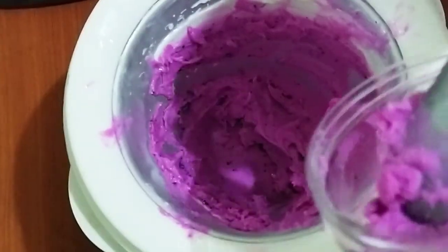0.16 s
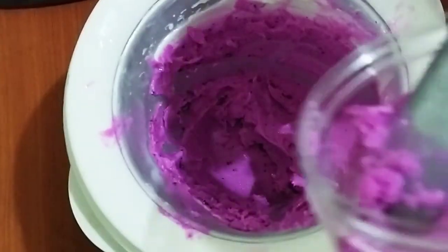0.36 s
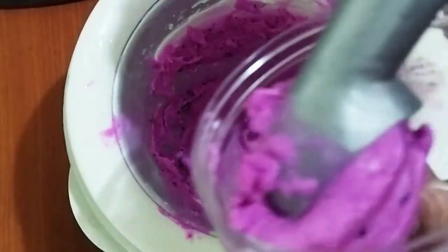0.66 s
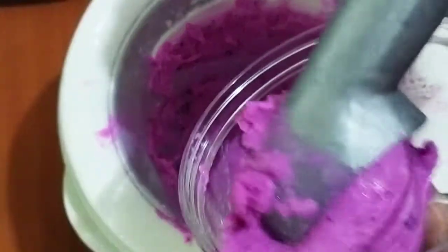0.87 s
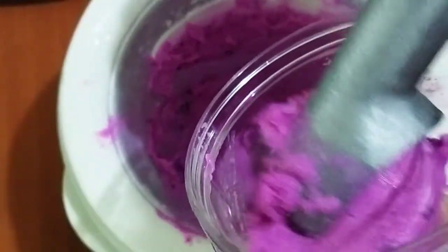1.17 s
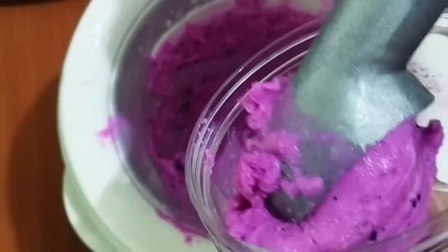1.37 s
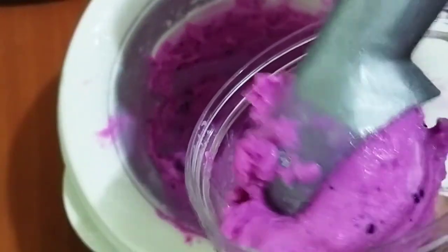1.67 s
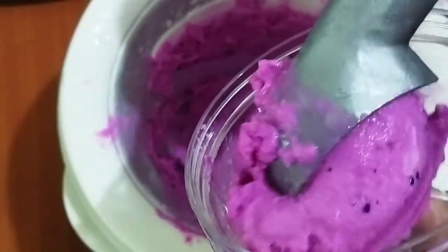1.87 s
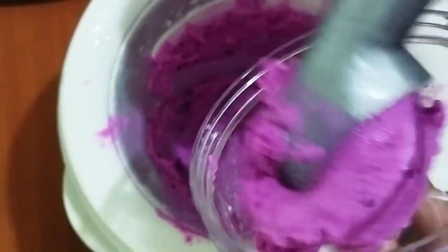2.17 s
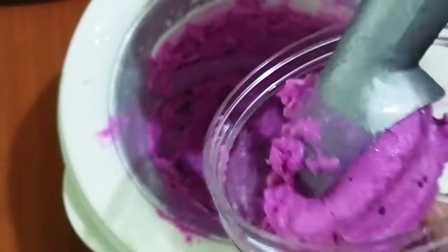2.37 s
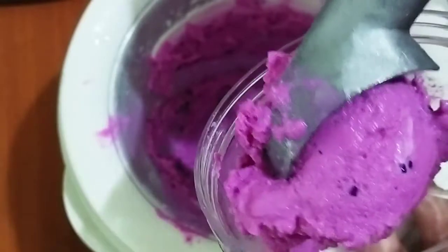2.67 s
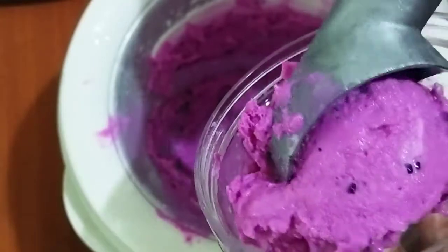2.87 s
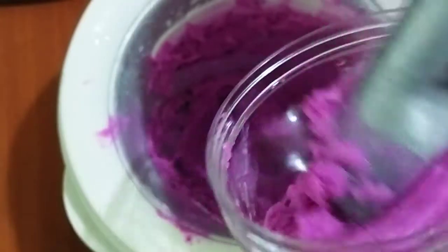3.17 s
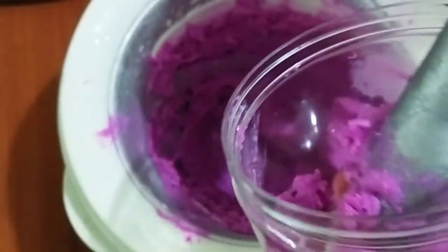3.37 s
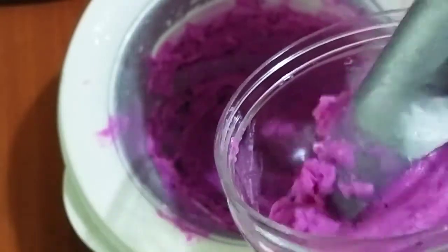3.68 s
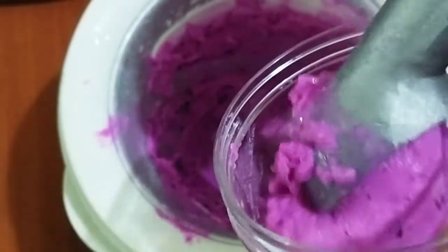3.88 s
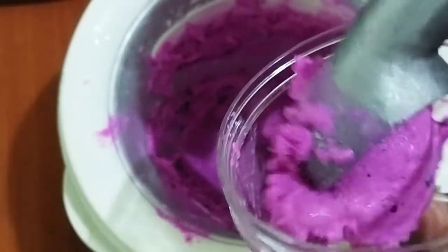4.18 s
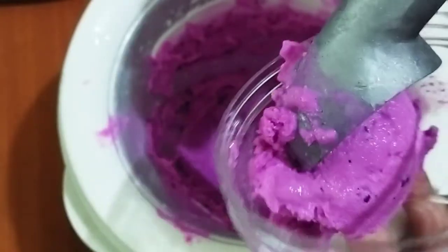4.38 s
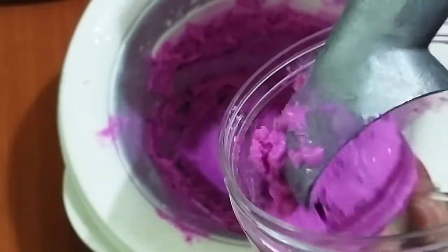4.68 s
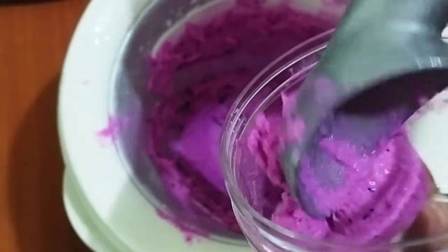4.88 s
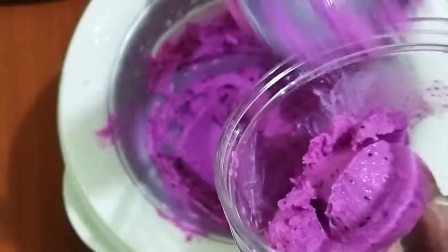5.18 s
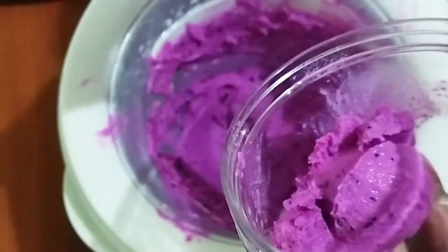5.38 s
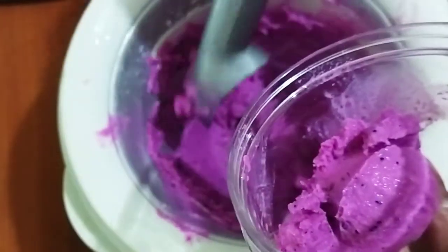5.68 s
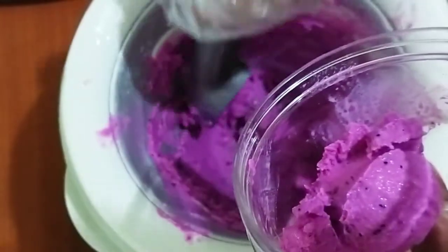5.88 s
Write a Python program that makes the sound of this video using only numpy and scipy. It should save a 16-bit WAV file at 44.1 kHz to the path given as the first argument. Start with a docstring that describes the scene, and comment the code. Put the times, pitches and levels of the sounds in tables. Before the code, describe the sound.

Very close stereo in a small kitchen with low, steady ventilation rumble. A metal scoop raps a hand-held bowl four times early, once much harder midway, then three softer times, each a hard tick with a short, damped, hollow ring and a brief room tail. Between blows, soft frozen dessert smears stickily with fine crackles and tiny bright ticks. At the end a thin plastic glove crinkles and rubs.

```python
"""A metal scoop knocks eight times on a hand-held bowl to shake off soft frozen dessert, close to the microphone:
each knock is a filtered noise tick plus decaying bowl modes.
Sticky dessert smears (filtered slips, small snaps) and ticks (short pings with splashes) between the knocks.
At the end a plastic glove rustles, made of crinkle hiss, rubbing grains and crease snaps.
A small kitchen (echoes, noise tail) answers each sound, over a low ventilation rumble of shaped noise."""
import sys
import numpy as np
from scipy import signal
from scipy.fft import rfft, irfft
from scipy.io import wavfile

SR = 44100
rng = np.random.default_rng(int(sys.argv[2]) if len(sys.argv) > 2 else 0)


def put_to_file(sound):
    """Save the sound as 16-bit audio at rate SR, in the file named by the first command-line argument."""
    columns = np.atleast_2d(sound).T  # one column per channel
    safe = np.clip(columns, -1, 1)
    whole_steps = np.round(safe * 32767)
    wavfile.write(sys.argv[1], SR, whole_steps.astype(np.int16))


N = 266804  # samples

# Left-right likeness of diffuse sound. Each row: frequency in Hz, likeness from 0 to 1.
LIKENESS = [(30, 0.93), (70, 0.98), (150, 1), (300, 0.83), (640, 0.38), (1400, 0.031), (4000, 0.027)]
# Spectrum of snapping dessert. Each row: frequency in Hz, relative level in dB.
SNAP_COLOUR = [(500, -30), (2000, -0.5), (4500, 4), (7000, 2.5), (10000, 6.5), (12500, 8.5), (16000, 7.5)]
EDGE_HZ = 16100  # upper band limit
BALANCE = np.array([[.5], [-.5]])  # left, right share of a pan in dB


def from_db(db):
    """Decibels to gain."""
    return 10 ** (np.asarray(db) / 20)


def unit(x):
    """Scales to rms 1."""
    return x / np.sqrt(np.mean(x ** 2) + 1e-20)


def read(points, hz):
    """Reads a table on a log-frequency axis."""
    f, value = np.transpose(points)
    return np.interp(np.log(hz + 1), np.log(f + 1), value)


def add(mix, start_s, sound):
    """Mixes a stereo sound in at start_s."""
    part = mix[:, max(round(start_s * SR), 0):][:, :sound.shape[1]]
    part += sound[:, :part.shape[1]]


def colour(x, points, size=2048):
    """Minimum-phase filter with the given spectrum; causal, so attacks stay sharp."""
    log_gain = np.log(from_db(read(points, abs(np.fft.fftfreq(size, 1 / SR)))))
    spectrum = np.exp(np.conj(signal.hilbert(log_gain)))
    taps = np.fft.ifft(spectrum).real[:size // 2]
    return signal.oaconvolve(x, taps[None], axes=1)[:, :x.shape[1]]


def correlate(left, other, hz):
    """Blends two independent spectra into a right channel as like the left as LIKENESS says."""
    same = np.clip(read(LIKENESS, hz), 0, 1)
    if left.ndim > 1:
        same = same[:, None]
    return same * left + np.sqrt(1 - same ** 2) * other


def ventilation(rms_db=-48.5):
    """Steady rumble lifted by the room's low modes, nearly mono in the bass."""
    # Each row: frequency in Hz, relative spectral level in dB.
    air_colour = [(25, -49), (50, -15.5), (66, -36), (85, -3), (130, -1.5), (200, -7), (300, -7.5),
                  (450, -14), (800, -21.5), (1500, -28), (3000, -32.5), (6000, -44), (10000, -52.5),
                  (16000, -47)]
    # Room modes. Each row: frequency in Hz, width in Hz, lift in dB.
    room_modes = [(89, 13, 6), (125, 3.2, 11.5), (161.6, 9.8, 3.5), (190.3, 10.6, 11), (278.6, 2.3, 9)]
    hz = np.fft.rfftfreq(N, 1 / SR)
    left, other = rfft(rng.standard_normal((2, N)))
    level_db = read(air_colour, hz)
    for mode_hz, width_hz, lift_db in room_modes:
        level_db = level_db + lift_db / (1 + (2 * (hz - mode_hz) / width_hz) ** 2)
    stereo = np.array([left, correlate(left, other, hz)])
    return from_db(rms_db) * unit(irfft(stereo * from_db(level_db), N))


def push(start_s, length_s, skew=1.3, sharpness=1.5):
    """Pressure of one push: it builds slowly, peaks late and lets go faster."""
    progress = np.clip((np.arange(N) / SR - start_s) / length_s, 0, 1)
    return abs(np.sin(np.pi * progress ** skew)) ** sharpness


def friction(stroke, points, per_s, spread_db, clump_db, clump_s, pan_db):
    """Countless tiny slips of uneven size come in clumps and merge into a grainy hiss."""
    t, knots = np.arange(N) / SR, np.arange(0, N / SR, clump_s)
    sizes = from_db(spread_db * np.minimum(rng.exponential(1, N), 4))
    happens = rng.random(N) < per_s / SR
    slips = rng.standard_normal((2, N)) * sizes * happens
    slips *= from_db(clump_db * np.interp(t, knots, rng.standard_normal(len(knots))))
    return unit(colour(slips, points)) * stroke * from_db(BALANCE * pan_db)


def crackle(stroke, points, per_s, spread_db, decay_s):
    """Separate little snaps of uneven size, each ringing briefly at its own pitch."""
    t = np.arange(SR // 280) / SR
    draws = rng.random((round(per_s * N / SR), 5))
    when, pitch, chance, *phases = draws.T[:, :, None]
    sizes = from_db(spread_db * np.minimum(-np.log(1 - chance), 3))
    shape = sizes * np.exp(-t / decay_s)
    at = ((when * N).astype(int) + np.arange(len(t))).ravel()
    snaps = []
    for phase in phases:  # left, right
        rings = shape * np.sin(2 * np.pi * (pitch * EDGE_HZ * t + phase))
        snaps.append(np.bincount(at, rings.ravel(), N)[:N])
    return unit(colour(np.array(snaps), points)) * stroke


def smear(gain_db=-2, cling_db=-74, cell_share=.6):
    """Wet dessert slides over the metal, and small air cells in it burst as it goes."""
    # Pushes through the dessert. Each row: start in seconds, length in seconds, level in dB before gain_db.
    pushes = [(-.06, 0.11, -63), (.02, 0.075, -56), (.094, 0.065, -53), (0.157, 0.11, -63),
              (0.283, .12, -56.5), (.5, 0.061, -70), (0.763, 0.048, -57.5), (.85, .12, -65),
              (.99, .11, -58), (1.1, .08, -63), (1.208, 0.067, -60), (1.272, .06, -70), (1.7, 0.084, -63),
              (1.767, .06, -58.5), (1.828, 0.14, -62), (1.98, 0.084, -62.5), (2.048, .04, -56),
              (2.1, 0.062, -53), (2.162, .1, -53), (2.257, 0.044, -59), (2.319, 0.095, -53.5),
              (2.72, 0.46, -67), (3.051, 0.16, -49.5), (3.196, 0.077, -51), (3.257, 0.28, -62),
              (3.547, 0.064, -57), (3.592, 0.13, -52.5), (3.716, 0.067, -45), (3.786, 0.077, -52),
              (3.865, 0.073, -54.5), (3.936, 0.066, -54), (4.015, .06, -56), (4.15, 0.086, -62.5),
              (4.216, 0.17, -60), (4.368, 0.086, -64), (4.614, 0.14, -64), (4.722, 0.19, -58.5),
              (4.926, 0.28, -62.5)]
    # Each row: frequency in Hz, relative level in dB.
    slide_colour = [(800, 1.5), (2500, 5.5), (4500, 1), (7000, -6), (9500, 9.5), (12500, 2), (15000, -9),
                    (16500, 6.5)]
    pressure = from_db(cling_db)  # dessert creeps on the scoop between pushes
    for start_s, length_s, level_db in pushes:
        pressure = pressure + from_db(level_db) * push(start_s, length_s)
    slide = friction(pressure, slide_colour, per_s=22000, spread_db=2.5,
                     clump_db=1.8, clump_s=0.016, pan_db=1.5)
    cells = crackle(pressure, SNAP_COLOUR, per_s=900, spread_db=3.4, decay_s=.0004)
    return from_db(gain_db) * (slide + cell_share * cells)


def kitchen(x, onset_s=0.0011, build_cycles=18):
    """A few dull echoes, and a dense tail in which each band dies at its own speed."""
    # Walls and counter. Each row: delay in seconds, level in dB.
    echoes = [(0.0253, -8.5), (0.0328, -22), (.0524, -39)]
    # Each row: frequency in Hz, 60 dB decay time in seconds.
    decay_times = [(200, 0.28), (450, 0.79), (1000, 0.77), (2200, 0.68), (5000, 0.63), (9000, 0.63),
                   (16000, 0.63)]
    # Each row: frequency in Hz, tail level in dB.
    tail_levels = [(100, -4), (400, -7), (800, -9), (1500, -13.5), (2200, -5), (3500, -7), (5000, -7.5),
                   (6500, -10.5), (10000, -11), (16000, -16)]
    hz, t, z = signal.stft(rng.standard_normal((2, SR)), SR, nperseg=256)
    z[1] = correlate(z[0], z[1], hz)
    fall = np.log(1000) / read(decay_times, hz)[:, None]
    z *= from_db(read(tail_levels, hz))[:, None] * np.sqrt(2 * fall / SR) * np.exp(-fall * t)
    z *= 1 - np.exp(-(t * hz[:, None] / build_cycles) ** 2)  # bass takes longer to fill the room
    tail = signal.istft(z, SR)[1][:, :SR] * (np.arange(SR) / SR > onset_s)
    smudge = signal.windows.hann(61) * np.ones((2, 1)) / 30  # cluttered surfaces dull each echo
    for delay_s, level_db in echoes:
        add(tail, delay_s, from_db(level_db) * smudge)
    return signal.fftconvolve(x, tail, axes=1)[:, :N]


def ticks(ring_s=0.00028, splash_s=.0005, splash_db=-6, hiss_db=-17, hiss_s=0.0033, delay_s=.00076):
    """An air pocket or crease snaps: a few-cycle ping, a tiny broad splash with a short, fainter tail of hiss."""
    # Each row: start in seconds before delay_s, ping level in dB, ping pitch in Hz,
    # splash level in dB on top of splash_db, left-over-right pan in dB.
    tick_list = [(0.1062, -36, 10600, 5.5, -3), (0.1887, -38, 10300, -3, -4), (0.3178, -38, 12000, 7, -1),
                 (0.35, -45, 9400, 3, 5), (0.4373, -34.5, 11950, 0.5, -2), (0.6974, -46, 13300, 3, 3),
                 (0.8642, -37, 4660, 5, 2), (0.9937, -48, 10500, 0, -3.5), (1.1488, -42, 12000, 8, 6),
                 (1.2496, -54, 4760, 11, -4), (1.3799, -45, 12000, 4, -2), (1.7125, -54, 12000, 2, -1.5),
                 (1.7262, -45.5, 12300, 5, -6), (1.7387, -49.5, 3500, 2, 0), (1.7933, -28, 11960, -7, -3),
                 (1.861, -39, 14600, 3, -1), (1.876, -37, 14600, 5.5, 2), (1.8951, -42, 9300, -7, 4),
                 (2.0103, -44, 12600, 6, 2), (2.059, -41.5, 11800, 4, -4), (2.0795, -44, 14300, 3, 0),
                 (2.1156, -42, 13600, 5.5, 0), (2.225, -45, 9500, -5, 2), (2.2767, -45, 11700, 7.5, 1),
                 (2.399, -40.5, 10000, 3, 1.5), (2.7162, -53.5, 11000, 8, .5),
                 (2.7638, -45, 15100, 7, -1.5), (2.7796, -46, 12300, 4, 0), (3.0965, -42.5, 9190, 2, 0),
                 (3.1695, -36.5, 9600, 8.5, -1), (3.1824, -36, 9500, 1, -7), (3.214, -51, 3580, 0, 0),
                 (3.245, -37, 15400, 6.5, -1), (3.296, -44, 11600, 4, -1.5), (3.3742, -43, 9600, 2, 5),
                 (3.4402, -51.5, 3925, -6, 0), (3.4796, -47, 11900, 2, -3), (3.589, -47, 9600, 0.5, -2),
                 (3.6127, -39, 15600, 0, 2), (3.6878, -35, 9330, -5, -4), (3.703, -43, 9050, -5, -2),
                 (3.719, -41, 9170, 0, 0), (3.7358, -43, 12600, -5, -2), (3.745, -37, 8300, 0, 4),
                 (3.9704, -39, 9200, -2, .5), (4.2408, -41, 12200, 0, -4), (4.4016, -38.5, 10400, -6, -9),
                 (4.4345, -47.5, 9600, 3, 2), (4.702, -45.5, 9260, 1.5, 6), (4.7694, -46.5, 8750, 7, 4),
                 (4.785, -50, 10300, 3, -4), (4.8404, -43, 12400, -3, -.5), (5.3347, -42, 9200, -1, 0),
                 (5.422, -38, 12200, 4, -5), (5.5105, -33, 11900, -2, -5), (5.6337, -39.5, 3670, -5, 0),
                 (5.7476, -39, 9350, -10, 11), (5.9416, -41, 9040, 0, 3.5)]
    out, t = np.zeros((2, N)), np.arange(SR // 25) / SR
    swell = t / ring_s * np.exp(1 - t / ring_s)
    splash_swell = t / splash_s * np.exp(1 - t / splash_s)
    hiss_swell = t / hiss_s * np.exp(1 - t / hiss_s)
    burst = unit(splash_swell + from_db(hiss_db) * hiss_swell)
    for start_s, size_db, hz, wet_db, pan_db in tick_list:
        ping = swell * np.sin(2 * np.pi * (hz * t + rng.random((2, 1))))
        noise = rng.standard_normal((2, len(t))) * burst
        splash = unit(colour(noise, SNAP_COLOUR)) / burst.max()
        snap = ping + from_db(splash_db + wet_db) * splash
        add(out, start_s + delay_s, snap * from_db(size_db + BALANCE * pan_db))
    return out


def knocks(contact_db=-7.5, rise_cycles=2.18, lag_s=.00045, beam_hz=1200, spill_hz=4300,
           spot_db=1.1, spot_detune=.005):
    """Each blow is a metal tick and a fast-dying ring; the bowl moves, so the room answers each differently."""
    # Each row: start in seconds, force in dB, wall, rim and clink mode levels in dB, contact tick level in dB
    # on top of contact_db, contact decay in seconds, ring length factor, pitch factor of the low modes.
    blows = [(0.3249, -15, 3, -4, -4.5, -6, 0.0047, 1.07, 1.015),
             (0.8385, -13.5, 0.5, -6, -3, -2.5, .0028, 1.08, 1.016),
             (1.033, -14, 0, -4.5, -3, -3.5, .003, 0.97, 1.035),
             (1.2184, -17.5, 1, -4.5, -2.5, -6, 0.0024, 0.85, 1.033),
             (2.44, -3.5, -2, -5, -4.5, -2, 0.0024, 0.57, 1.03),
             (3.2271, -15.5, 0.5, -5.5, -6.5, -13.5, 0.0079, 0.41, .98),
             (3.7557, -13.5, -3, -5.5, -6, -3, 0.003, 0.82, 1.03),
             (4.035, -14.5, -2.5, -6.5, -5, -5, 0.0022, 0.69, 1.023)]
    # Bowl with the scoop against it, damped by hand and dessert. Each row: mode in Hz and 60 dB decay
    # in seconds, both before the blow's factors, left level in dB, right level in dB.
    bowl_modes = [(325, 0.065, -9.5, -12.5), (396.5, 0.17, -1.5, -4.5), (376, 0.38, -23, -29),
                  (423, 0.47, -27, -26), (754, 0.12, -19, -32), (804.5, 0.051, -12.5, -15.5),
                  (836, 0.061, -18, -11.5), (880, 0.058, -17.5, -15), (920, 0.089, -31, -26.5),
                  (1278, 0.077, -21, -14), (1526, 0.05, -13, -20), (1654, 0.046, -24, -5.5),
                  (1776, 0.051, -11, -13), (1966, 0.042, -23, -39), (2179, 0.04, -12, -4),
                  (2252, 0.028, -29, -7), (2315, 0.019, -24, -12), (2513, 0.061, -22, -20.5),
                  (3020, 0.045, -19.5, -38), (3295, 0.033, -33, -14), (3560, 0.052, -19, -42),
                  (3730, 0.056, -36, -15), (4230, 0.038, -29.5, -27), (4790, 0.026, -15, -16),
                  (5220, 0.027, -29, -17.5), (5680, 0.015, -17, -12.5), (8510, 0.0042, -2, -16),
                  (9460, 0.0068, -8, -17), (11850, 0.02, -30, -22)]
    # Hard contact of the metal. Each row: frequency in Hz, level in dB.
    contact_colour = [(30, -3), (70, -17), (235, 12.5), (600, -20), (900, -11), (1120, 2.5), (1290, -4),
                      (1430, -17), (1700, 10.5), (2300, 3.5), (2800, -4.5), (3800, -3.5), (5500, -5),
                      (7200, -9), (9500, -4), (12500, -5), (16000, -15)]
    # the bowl flexes as a whole below wall_hz; wall rings to rim_hz, rim to clink_hz; above, it clinks
    wall_hz, rim_hz, clink_hz = 600, 1450, 2700
    out, t = np.zeros((2, N)), np.arange(SR // 2) / SR
    for start_s, force_db, wall_db, rim_db, clink_db, tick_db, contact_s, ring, pitch in blows:
        chatter = from_db(contact_db + tick_db) * np.exp(-t / contact_s) * np.ones((2, 1))
        blow = colour(rng.standard_normal(t.shape) * chatter, contact_colour)
        blow[0] = np.roll(blow[0], round(lag_s * SR))
        # summed over all directions, the tick is one smooth pulse of the same energy
        pulse = np.linalg.norm(chatter[0]) * (t == 0) * np.ones((2, 1))
        around = colour(pulse, contact_colour)
        for k, (hz, t60_s, left_db, right_db) in enumerate(bowl_modes):
            level_db = np.array([[left_db], [right_db]])
            if hz < wall_hz:
                hz = hz * pitch  # the load of dessert shifts the low modes
            else:  # where the scoop lands sets level and pitch of the upper modes
                group_db = wall_db if hz < rim_hz else rim_db if hz < clink_hz else clink_db
                level_db = level_db + group_db + spot_db * rng.standard_normal()
                hz = hz * (1 + spot_detune * rng.standard_normal())
            # high modes radiate from the struck rim, nearer the right port; the lowest from the whole bowl
            mode_lag_s = lag_s * (1 - np.exp(-(hz / beam_hz) ** 2))
            age = np.maximum(t - np.array([[mode_lag_s], [0]]), 0)
            sign = -1 if k == 0 else 1  # the held bowl recoils against its main flexing mode
            swing = sign * np.sin(2 * np.pi * hz * age) * (1 - np.exp(-age * hz / rise_cycles))
            swing *= np.exp(-np.log(1000) * age / (t60_s * ring))
            blow += from_db(level_db) * swing
            # the open bowl beams its highest modes up at the microphone, so they spill less into the room
            spill = 1 / np.sqrt(1 + (hz / spill_hz) ** 4)
            around += spill * np.sqrt(np.mean(from_db(level_db) ** 2)) * swing
        add(out, start_s, from_db(force_db) * blow)
        add(out, start_s, from_db(force_db) * kitchen(around))
    return out


def reach(start_s, length_s, attack_s=0.098, release_s=0.045):
    """Speed of the hand: it gathers pace, holds and, after length_s, comes to rest."""
    age = np.arange(N) / SR - start_s
    return np.clip(age / attack_s, 0, 1) ** 2 * np.exp(-np.maximum(age - length_s, 0) / release_s)


def glove(rub_gain_db=-0.5, crease_share=.95):
    """Thin plastic crinkles, rubs in coarse grains and snaps at its creases as the hand reaches back for more."""
    # Moves of the gloved hand. Each row: start in seconds, length in seconds, crinkle level in dB,
    # rubbing level in dB before rub_gain_db.
    moves = [(5.196, 0.26, -60, -65.5), (5.289, 0.11, -55, -55), (5.412, 0.13, -51, -56),
             (5.542, 0.39, -59, -65), (5.856, 0.21, -52.5, -69)]
    # Each row: frequency in Hz, relative level in dB.
    crinkle_colour = [(3000, -10), (7400, -8), (9000, -1.5), (12000, -3), (15000, -2.5), (16000, -14)]
    # Each row: frequency in Hz, relative level in dB.
    rub_colour = [(400, -19), (1000, -30), (1600, -4), (2800, 5), (4200, 2.5), (6000, -6.5), (9000, -11)]
    flexing = sum(from_db(db) * reach(start_s, length_s) for start_s, length_s, db, _ in moves)
    sliding = sum(from_db(db) * reach(start_s, length_s) for start_s, length_s, _, db in moves)
    crinkle = friction(flexing, crinkle_colour, per_s=24000, spread_db=1.5,
                       clump_db=1.8, clump_s=0.012, pan_db=2.5)
    rub = crackle(sliding, rub_colour, per_s=4000, spread_db=2.6, decay_s=.001)
    creases = crackle(flexing, crinkle_colour, per_s=3200, spread_db=2.8, decay_s=.0009)
    return crinkle + crease_share * creases + from_db(rub_gain_db) * rub


def scene(handling_room_db=-1):
    """Close sounds, their room, and the rumble."""
    handling = smear() + ticks() + glove()
    handling_room = from_db(handling_room_db) * kitchen(handling)
    return ventilation() + handling + handling_room + knocks()


def record(dry):
    """The recorder's band limit."""
    taps = signal.firwin(401, EDGE_HZ, window=("kaiser", 9), fs=SR)
    return signal.oaconvolve(dry, taps[None], "same", axes=1)


dry = scene()
out = record(dry)
put_to_file(out)
```